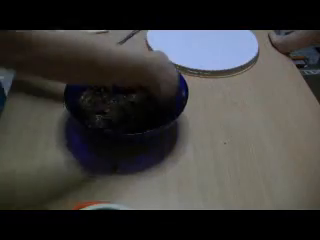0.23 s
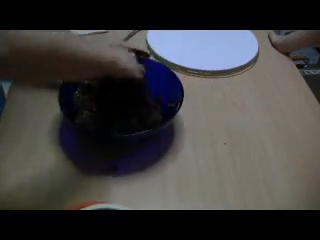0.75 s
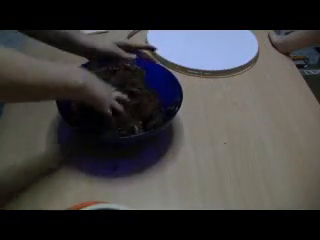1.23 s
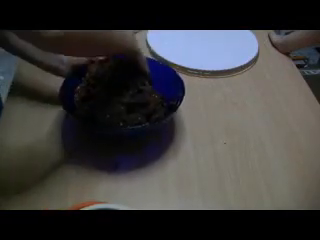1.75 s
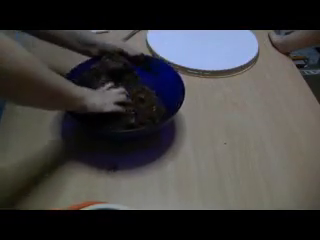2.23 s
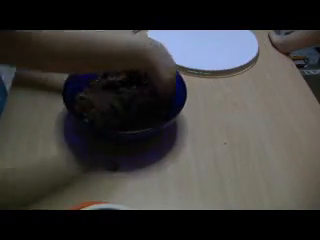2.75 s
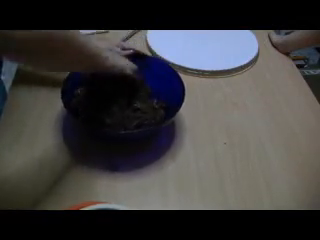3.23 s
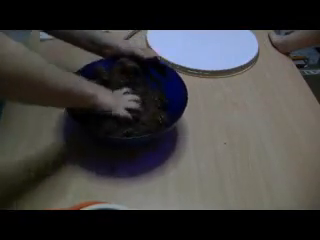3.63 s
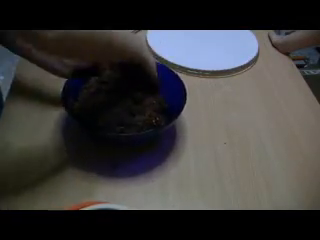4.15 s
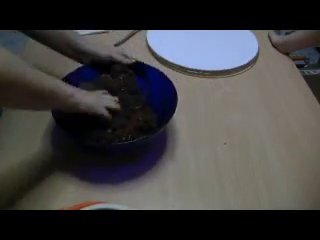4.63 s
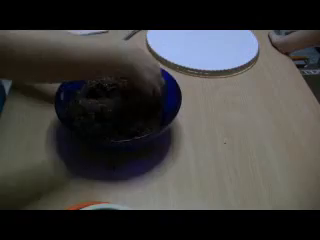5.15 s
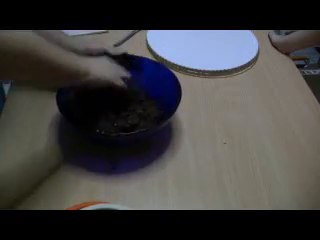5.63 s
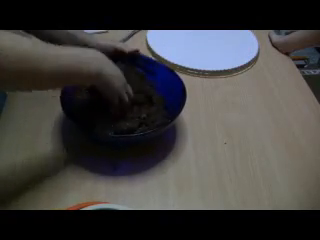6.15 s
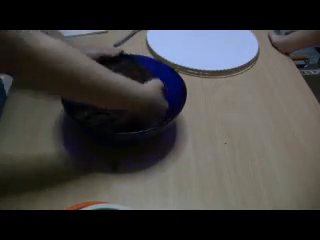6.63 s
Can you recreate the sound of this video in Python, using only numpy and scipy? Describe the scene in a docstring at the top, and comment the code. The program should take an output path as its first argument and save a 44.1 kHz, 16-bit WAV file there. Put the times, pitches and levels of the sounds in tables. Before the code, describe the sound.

A hand kneads crumbly dough in a glass bowl that knocks on a wooden table, with a few sharp clinks.

```python
"""Close to a glass bowl on a wooden table, in a small hard room, on a stereo microphone. Over faint room noise
a hand is already kneading biscuit dough: crumbs crackle and the mass rubs round the glass with every stroke.
Almost at once the bowl rolls on its foot and knocks on the table, as it will now and then throughout. After a
second stuck dough snaps free and rings the bowl, the first of five clinks. The loudest knock comes at two
seconds; from three on, fingers squeak at times."""
import sys
import numpy as np
from scipy import signal
from scipy.fft import rfft, irfft
from scipy.io import wavfile

SR = 44100
rng = np.random.default_rng(int(sys.argv[2]) if len(sys.argv) > 2 else 0)


def file_out(sig):
    """Save sig as 16-bit WAV at sys.argv[1]."""
    # one column per channel
    cols = np.atleast_2d(sig).T
    # limit, then scale
    lim = np.clip(cols, -1, 1)
    pcm = np.round(lim * 32767).astype(np.int16)
    wavfile.write(sys.argv[1], SR, pcm)


N = 303530

# The bowl rolls over its foot, lands and rebounds. Each row: landing in seconds, force in dB, contact
# hardness in Hz, grinding before it in dB, wait for the first rebound in seconds, its relative force in dB.
LANDINGS = [(0.106, -26.5, 500, -62, .015, -13), (0.385, -38, 400, -54.5, .015, -21),
            (0.6243, -14.5, 476, -48, .0126, 6.5), (1.9398, -10.5, 550, -42, .0158, -9),
            (1.9962, 1.5, 640, -30.5, .0207, -6), (3.3904, -14, 440, -52, .016, -18.5),
            (3.879, -28, 500, -79, .015, -10.5), (4.3707, -13.5, 704, -57, .02, -6),
            (4.4219, -3, 760, -32.5, .018, -4), (5.9684, -19.5, 630, -68, .015, -14)]


def amp(db):
    """Decibels to gain."""
    return 10 ** (np.asarray(db) / 20)


def unit_rms(x):
    """Scales to rms 1."""
    return x / np.sqrt(np.mean(x ** 2) + 1e-20)


def curve_at(points, hz):
    """Reads a table on a log-frequency axis."""
    f, value = np.transpose(points)
    return np.interp(np.log(hz + 1), np.log(f + 1), value)


def add(mix, s, sound):
    """Adds a sound to the mix at s seconds."""
    part = mix[max(round(s * SR), 0):][:len(sound)]
    part += sound[:len(part)]


def pulse(spectrum, size=4096):
    """The sharpest causal pulse that has this spectrum."""
    hz = abs(np.fft.fftfreq(size, 1 / SR))
    log_gain = np.log(amp(curve_at(spectrum, hz)))
    minimum_phase = np.exp(np.conj(signal.hilbert(log_gain)))
    return np.fft.ifft(minimum_phase).real[:size // 2]


def colour(x, spectrum):
    """Filters a sound by a spectrum."""
    return signal.oaconvolve(x, pulse(spectrum))[:len(x)]


def ring(modes, t, damping=1):
    """A struck body's dying partials; neighbouring modes swing in opposite directions."""
    return sum((-1) ** k * amp(db - 60 * t * damping / t60) * np.sin(2 * np.pi * hz * t)
               for k, (hz, db, t60) in enumerate(modes))


def swell(t, length_s):
    """A rounded rise and fall about time zero."""
    return 1 / np.cosh(np.clip(t / length_s, -50, 50))


def diffuse_pair(a, b, hz):
    """Two unrelated spectra become left and right of a diffuse field at the microphone."""
    # Each row: frequency in Hz, likeness of the two sides from 0 to 1.
    likeness = [(30, 0.6), (100, 0.4), (300, 0.07), (600, 0.45), (1200, 0.11), (4000, 0.42), (12000, 0.3)]
    same = np.clip(curve_at(likeness, hz), 0, 1)
    mid, side = np.sqrt((1 + same) / 2) * a, np.sqrt((1 - same) / 2) * b
    return np.array([mid + side, mid - side])


def room(x, gap_s=0.0084, build_s=0.0023, side_db=0):
    """Dense reflections off near, hard walls build up quickly, each band dying at its own speed."""
    # Each row: frequency in Hz, seconds to fall 60 dB.
    decay_times = [(100, 0.37), (300, 0.74), (800, 0.54), (2000, 0.55), (5000, 0.5), (9000, 0.46),
                   (15000, 0.2)]
    hz, t, noise = signal.stft(rng.standard_normal((2, SR)), SR, nperseg=512)
    field = diffuse_pair(noise[0], amp(side_db) * noise[1], hz[:, None])
    decay = amp(-60 * t / curve_at(decay_times, hz)[:, None])
    tail = signal.istft(field * decay, SR, nperseg=512)[1]
    tail *= np.clip((np.arange(tail.shape[1]) / SR - gap_s) / build_s, 0, 1)
    return signal.fftconvolve(x[None], tail / np.linalg.norm(tail[0]), axes=1)[:, :N]


def room_tone():
    """Faint steady room noise with a few hollow resonances, and microphone hiss."""
    # Each row: frequency in Hz, relative level in dB.
    noise_floor = [(25, -40), (60, -23.5), (110, -2.5), (220, -7.5), (400, -1), (850, -5.5), (1150, -6.5),
                   (2500, -8.5), (5000, -14), (10000, -16), (13200, -18), (13750, -8), (14300, -25),
                   (16000, -29)]
    # Each row: centre in Hz, width in Hz, lift in dB.
    resonances = [(370, 26, 5), (488.5, 14, 15.7), (525, 16, 1.2), (642, 9.7, 22), (752, 24, 7.6),
                  (760, 15, 3.7), (856, 14, 16.4), (934, 18, 7.8), (1150, 11, 3.1), (1287, 67, 8.8)]
    hz = np.fft.rfftfreq(N, 1 / SR)
    peaks_db = sum(db / (1 + (2 * (hz - f) / width) ** 2) for f, width, db in resonances)
    shape = amp(curve_at(noise_floor, hz) + peaks_db)
    field = diffuse_pair(*rfft(rng.standard_normal((2, N))), hz)
    return amp(-53.5) * unit_rms(irfft(field * shape, N))


def kneading():
    """Strength of crumbling and rubbing as the hand digs in, presses, shoves and crushes a lump."""
    # Each row: dig in seconds, crush in seconds, pressing in dB, crush in dB, crush length in seconds,
    # shove in dB, its lead on the crush in seconds.
    strokes = [(-.2, 0.074, -50, -47.5, 0.021, -44, 0.074), (0.293, 0.455, -59, -52, 0.04, -70, .03),
               (0.498, 1.372, -54.5, -40, 0.041, -45, 0.035),
               (1.746, 2.628, -54.5, -45, 0.049, -46.5, 0.29), (2.916, 3.327, -58, -49.5, 0.097, -59, 0.33),
               (3.363, 3.839, -54, -44.5, 0.053, -46.5, .11), (4.1, 5.062, -54, -41.5, 0.044, -46, 0.43),
               (5.3, 5.658, -54, -46.5, 0.065, -45.5, 0.13), (5.705, 6.254, -54, -44.5, 0.049, -46, 0.074),
               (6.525, 6.874, -54.5, -44.5, 0.037, -51.5, 0.14)]
    build_s, lift_s = 0.067, 0.045  # the pressure builds, and dies away as the hand lifts
    t = np.arange(0, N / SR, 1 / 500)
    crumbling, rubbing = np.zeros((2, len(t)))
    for dig_s, crush_s, press_db, crush_db, length_s, shove_db, lead_s in strokes:
        release = np.exp(-np.maximum(t - crush_s, 0) / lift_s)
        press = amp(press_db) * np.clip((t - dig_s) / build_s, 0, 1) * release
        crush = amp(crush_db) * swell(t - crush_s, length_s)
        shove = amp(shove_db) * swell(t - crush_s + lead_s, length_s=0.0083 + 0.67 * lead_s)
        crumbling += press ** 2 + crush ** 2
        rubbing += (amp(-6) * press) ** 2 + (amp(-7.5) * crush) ** 2 + shove ** 2
    return [np.interp(np.arange(N) / SR, t, np.sqrt(power)) for power in (crumbling, rubbing)]


def grains(per_s, spread_db, clump_db, clump_s):
    """Tiny fractures of very unequal size, which come in clumps."""
    size = amp(spread_db * np.minimum(rng.exponential(1, N), 4.5))
    clicks = size * rng.choice([-1, 1], N) * (rng.random(N) < per_s / SR)
    clumps = np.interp(np.arange(N) / SR / clump_s, np.arange(N), rng.standard_normal(N))
    return unit_rms(clicks * amp(clump_db * clumps))


def dough():
    """Crumbs crackle under the fingers, all across the bowl, while the mass slides round it."""
    # Breaking crumbs and sliding dough. Each row: frequency in Hz, relative level in dB.
    crumb_spectrum = [(100, -75), (600, -14.5), (1800, 0), (2800, -0.5), (4000, 0.5), (6000, 0.5),
                      (9000, 0), (12000, -0.5), (15500, -7)]
    rub_spectrum = [(40, -47), (110, -27), (200, -2.5), (400, 1.5), (700, 5), (1200, 5), (2000, 1.5),
                    (3200, -5.5), (6000, -15), (15000, -16)]
    crumbling, sliding = kneading()
    mid_cracks, side_cracks = (grains(per_s=5000, spread_db=2.5, clump_db=1.5, clump_s=0.0071)
                               for _ in range(2))
    drags = grains(per_s=2700, spread_db=1.5, clump_db=2, clump_s=0.014)
    crumbs = amp(0.07) * unit_rms(colour(mid_cracks, crumb_spectrum)) * crumbling
    side = amp(-8.5) * unit_rms(colour(side_cracks, crumb_spectrum)) * crumbling
    rubbing = amp(-4.5) * unit_rms(colour(drags, rub_spectrum)) * sliding
    return crumbs + np.array([side, -side]) + rubbing + room(amp(-7.5) * crumbs + amp(-1) * rubbing)


def grinding():
    """A dull, uneven rumble that swells while the bowl rolls over its foot, up to each landing."""
    swell_s, stop_s = 0.028, 0.0047
    t = np.arange(N) / SR
    rolling = sum(amp(db) * np.exp(np.minimum((t - s) / swell_s, (s - t) / stop_s))
                  for s, _, _, db, _, _ in LANDINGS)
    bumps = grains(per_s=1100, spread_db=4.5, clump_db=-3, clump_s=0.0045)
    dull = [(50, -13.5), (120, -2), (300, -2.5), (600, -9), (1200, -16), (3000, -26), (12000, -52)]
    rumble = rolling * unit_rms(colour(bumps, dull))
    return rumble + room(amp(-4) * rumble)


def contacts(rebounds=4):
    """Every landing, rim slap and rebound, as time in seconds, force in dB and hardness in Hz."""
    gap_ratio, loss_db = 0.85, 7.5  # each rebound comes sooner and weaker
    for s, db, hard_hz, _, gap_s, rebound_db in LANDINGS:
        yield s, db, hard_hz
        yield s + 0.006, db - 10.5, hard_hz * 2.9  # the rest of the foot's rim slaps down
        for k in range(rebounds):
            s += gap_s * gap_ratio ** k
            yield s, db + rebound_db - k * loss_db, hard_hz * 2.4  # harder, on bare wood


def knocks():
    """Each landing of the bowl pushes the table top and sets it ringing."""
    # The loaded table top and the room's low standing waves.
    # Each row: frequency in Hz, relative level in dB, seconds to fall 60 dB.
    table_modes = [(106, -29, .35), (125.8, -16, 0.43), (179, -12.5, 0.46), (200, -22, 0.71),
                   (251.3, 1.5, 0.33), (276.7, -3.5, 0.24), (321.4, -4, 0.27), (368, -14, 0.5),
                   (399, -2.5, 0.35), (451, -7, 0.48), (492, -17, 0.21), (554.4, -3, 0.36), (598, 1, 0.61),
                   (678, -11, 0.73), (752, -2, 0.43), (812, 2.5, 0.4), (900, -16, 0.3), (1010, -1.5, 0.39),
                   (1105, -18, .35), (1249, 8, 0.2)]
    # The blow, and how strongly it fills the room. Each row: frequency in Hz, gain in dB.
    thud = [(30, -36), (70, -34), (105, -5.5), (170, -10), (280, 0), (550, -0.5), (1200, -4), (2000, -6.5),
            (4000, -14), (8000, -12), (16000, -21)]
    room_send = [(100, 0.5), (250, -1), (450, 5), (700, 7.5), (1100, 11), (2000, 9), (6000, 11.5)]
    t = np.arange(SR // 2) / SR
    forces = np.zeros((3, N))  # knocks take turns among three room echoes, so their clatter sounds even
    for k, (s, db, hard_hz) in enumerate(contacts()):
        u = 2 * np.pi * hard_hz * t
        push = u * np.exp(-u)  # a harder contact is shorter, so brighter
        add(forces[k % len(forces)], s, -amp(db) * push / push.sum())
    echo_feeds = [colour(force, thud) for force in forces]
    blow = sum(echo_feeds)
    body = amp(-24) * signal.oaconvolve(blow, ring(table_modes, t))[:N]
    # The wide top sends its lows straight to the microphone; the clatter comes by way of the walls.
    direct = amp(20.5) * colour(blow, [(150, 5), (400, 6.5), (800, 0), (1500, -4), (5000, 3.5)])
    walls = amp(19) * sum(room(colour(feed, room_send), gap_s=0.0013, build_s=0.0017, side_db=-8.5)
                          for feed in echo_feeds)
    return (direct + walls) * amp([[-0.9], [0.9]]) + body * amp([[-2], [2]])  # a little to the right


def tears_and_squeaks():
    """Stuck dough snaps off the glass, and fingers stick and slip on it."""
    # Each row: loudest moment in seconds, level in dB, pitch in Hz.
    tears = [(1.2425, -40, 1570), (1.317, -47, 1520), (1.351, -34.5, 1990), (4.595, -58, 1260)]
    squeaks = [(3.218, -45, 1580), (5.064, -41, 2840), (5.477, -49.5, 1570), (5.66, -53, 3000),
               (6.24, -43, 2700)]
    t = np.arange(SR // 4) / SR - 0.1
    slips = np.zeros(N)

    def slip(s, db, hz, width_hz, rise_s, fall_s):
        """Adds one burst of noise in a resonance."""
        pole = np.exp((2j * hz - width_hz) * np.pi / SR)
        resonance = np.poly([pole, pole.conjugate()]).real
        burst = unit_rms(signal.lfilter([1, 0, -1], resonance, rng.standard_normal(len(t))))
        envelope = np.exp(np.minimum(t / rise_s, -t / fall_s))
        add(slips, s + t[0], amp(db) * burst * envelope)

    for s, db, hz in tears:
        slip(s, db, hz, width_hz=1450, rise_s=0.00033, fall_s=0.02)
        slip(s, db - 5.5, hz=710, width_hz=98, rise_s=0.00033, fall_s=0.023)  # the hollow it opens
    for s, db, hz in squeaks:
        slip(s, db, hz, width_hz=620, rise_s=0.018, fall_s=0.0087)
    return slips + amp(-5) * room(slips)


def clinks():
    """A crack and a burst of the bowl's partials, mostly soaked up by the dough; the rest rings on."""
    # Blows that ring the bowl, each on another spot; the first comes as dough tears free. Each row: start in #
    # seconds, force in dB, ping lift in dB, treble lift in dB, brightest pitch in Hz, top lift in dB.
    strikes = [(1.3168, -16, -11, 4, 7400, -31), (1.7472, -2.5, -3.5, 6, 8100, -0.5),
               (2.903, -4.5, -2, 3, 8300, -8), (3.058, -20.5, -7, -22, 8000, -20),
               (4.1877, -4.5, -1, 5, 10200, -6)]
    # The glass with dough in it. Each row: frequency in Hz, relative level in dB, seconds to fall 60 dB.
    bowl_modes = [(818, -5, 0.15), (1407, -5.5, 0.23), (2070, 1, .34), (2890, 0, 0.29), (3796, -4, 0.19),
                  (4640, -9.5, 0.2), (7060, -3.5, 0.11), (7770, -1.5, 0.13), (8380, -5.5, 0.13),
                  (8750, 0, 0.17), (9540, -1.5, 0.18), (10620, 1.5, 0.12), (11700, -6.5, 0.26),
                  (13150, -15, .1), (14700, -10, 0.087)]
    # A tap's sharp crack. Each row: frequency in Hz, relative level in dB.
    crack = [(100, -60), (400, -42), (650, -14), (950, 0.5), (1600, -5), (2200, 19), (4000, -11),
             (5600, -5.5), (7200, -1), (8800, 6), (10700, -6), (12200, 5), (13500, -28), (16000, -36)]
    t = np.arange(SR // 2) / SR
    tap = amp(-17) * ring(bowl_modes, t, damping=17.2)
    add(tap, 0, amp(-1.5) * pulse(crack))
    # The rim's lobes reach the two sides slightly out of step.
    rims = amp(-35) * np.array([ring(bowl_modes, t), ring(bowl_modes, t + 0.000015)])
    blows = np.zeros(N)
    for s, db, ping_db, treble_db, bright_hz, top_db in strikes:
        contact = [(2100, 0), (2900, ping_db), (4000, 0),
                   (0.9 * bright_hz, treble_db - 3.5), (bright_hz, treble_db), (14000, top_db)]
        add(blows, s, amp(db) * pulse(contact))
    bass_cut = signal.butter(2, 450, "highpass", fs=SR, output="sos")  # the taps carry no bass below about 450 Hz
    blows = signal.sosfilt(bass_cut, blows)
    taps = signal.oaconvolve(blows, tap)[:N]
    ringing = signal.oaconvolve(blows[None], rims, axes=1)[:, :N]
    return taps + ringing + room(amp(1) * taps + amp(-8.5) * ringing[0], gap_s=0.0013, build_s=0.0041)


def scene():
    """Everything that reaches the microphone at the table."""
    return room_tone() + dough() + grinding() + knocks() + tears_and_squeaks() + clinks()


def record(dry):
    """The microphone's bass cut and band limit."""
    low_hz, high_hz = 70, 15750
    bass_cut = signal.butter(2, low_hz, "highpass", fs=SR, output="sos")
    band_limit = signal.firwin(511, high_hz, window=("kaiser", 9), fs=SR)
    return signal.oaconvolve(signal.sosfilt(bass_cut, dry), band_limit[None], "same")


dry = scene()
out = record(dry)
file_out(out)
```